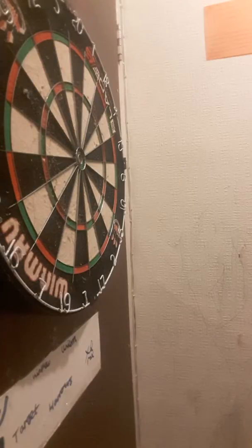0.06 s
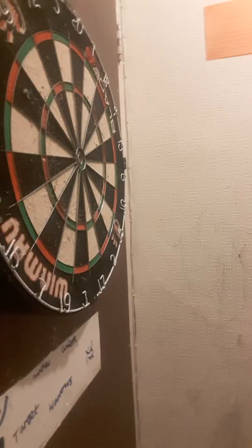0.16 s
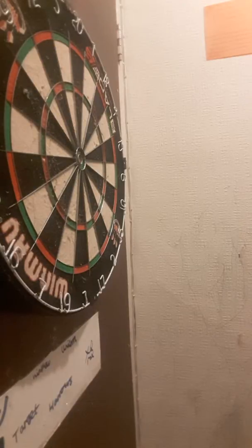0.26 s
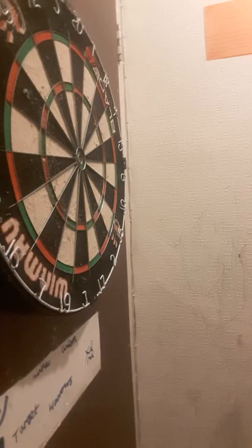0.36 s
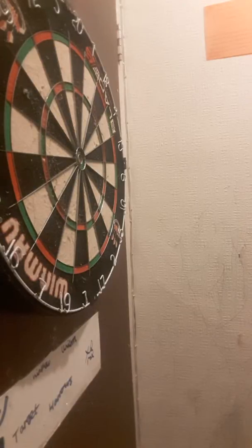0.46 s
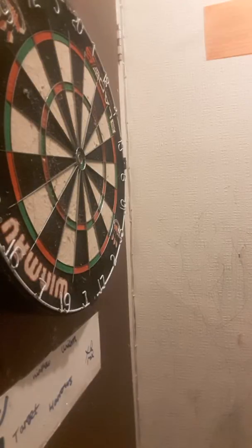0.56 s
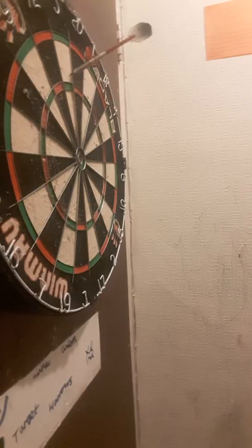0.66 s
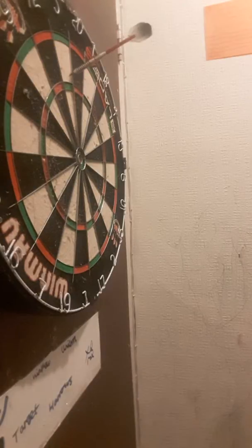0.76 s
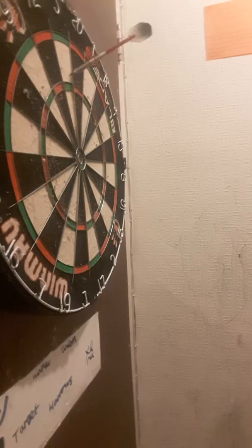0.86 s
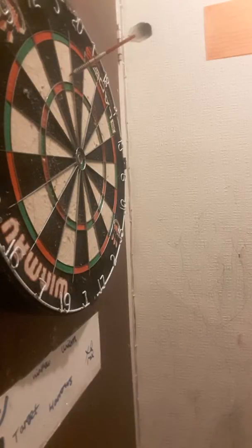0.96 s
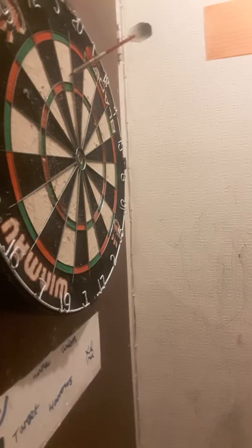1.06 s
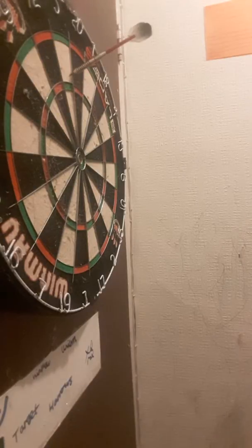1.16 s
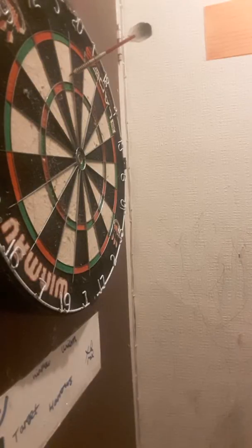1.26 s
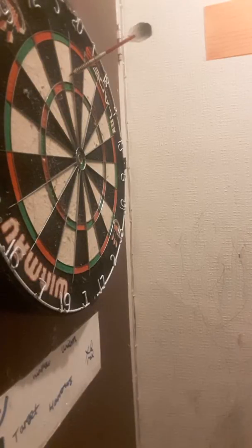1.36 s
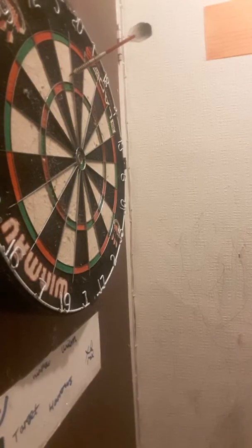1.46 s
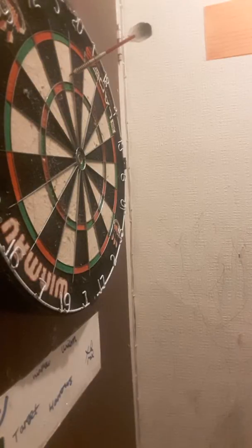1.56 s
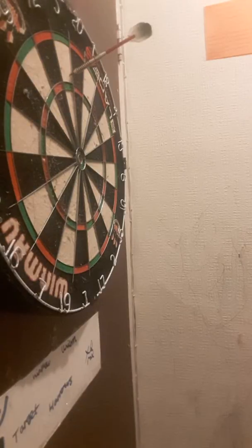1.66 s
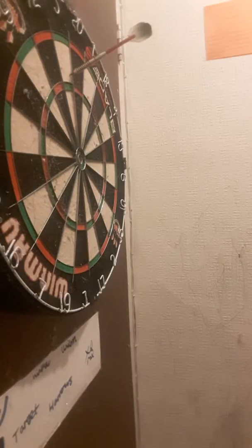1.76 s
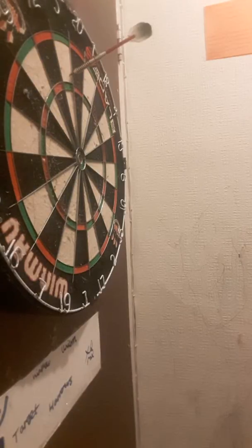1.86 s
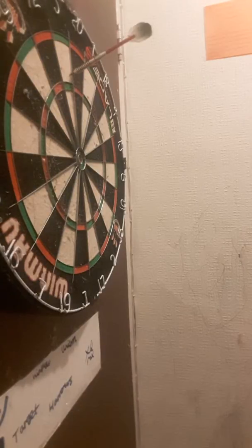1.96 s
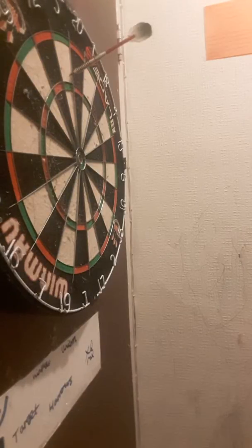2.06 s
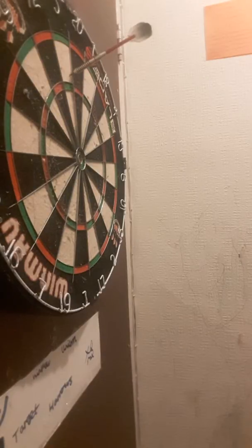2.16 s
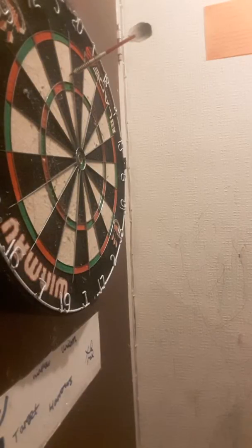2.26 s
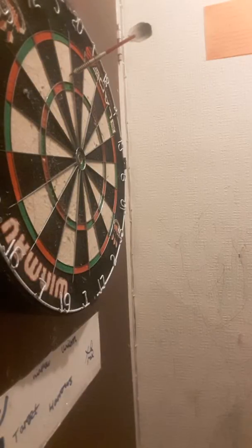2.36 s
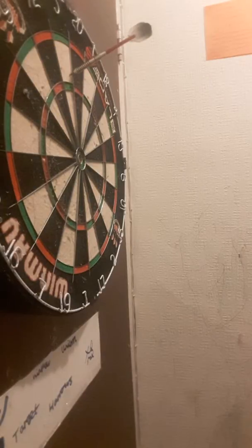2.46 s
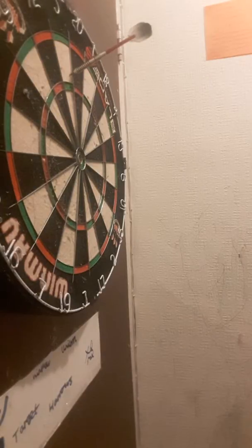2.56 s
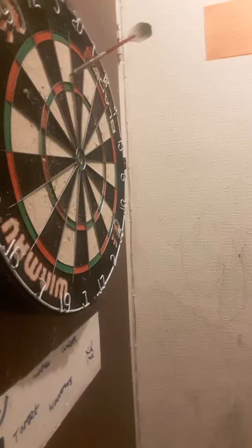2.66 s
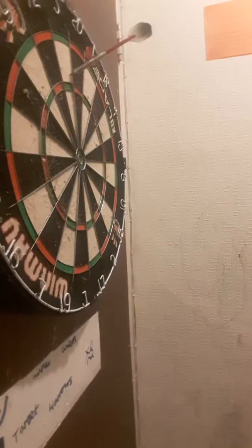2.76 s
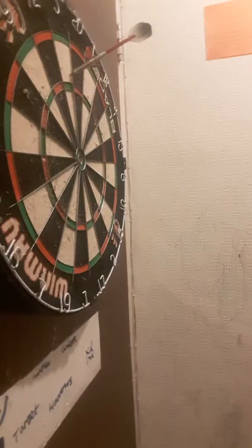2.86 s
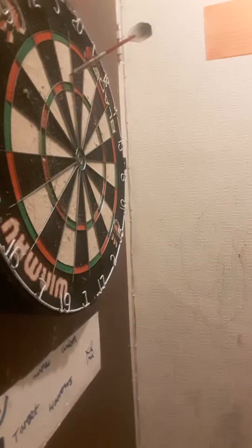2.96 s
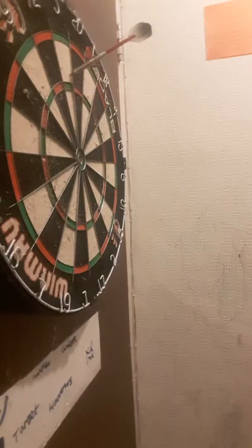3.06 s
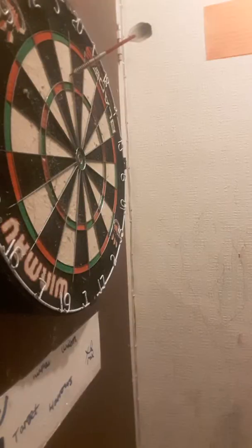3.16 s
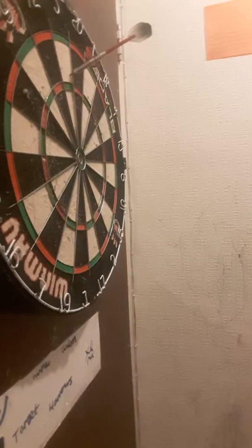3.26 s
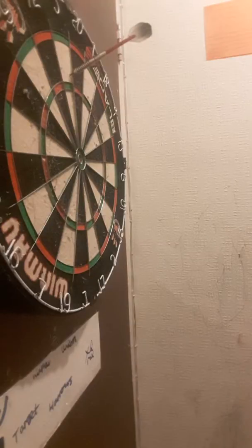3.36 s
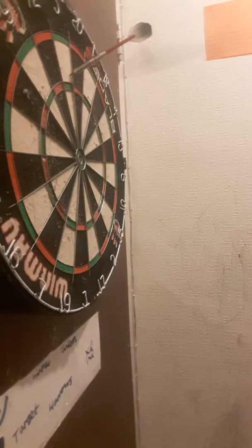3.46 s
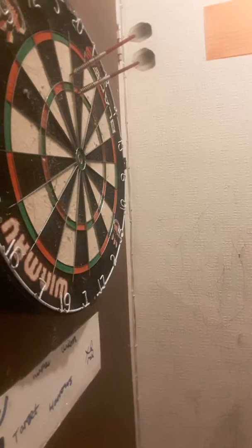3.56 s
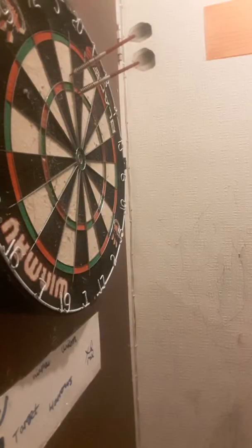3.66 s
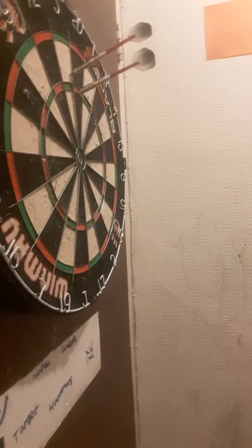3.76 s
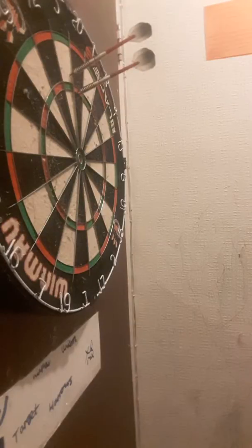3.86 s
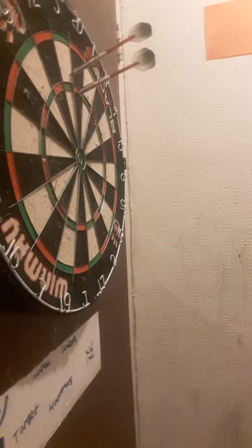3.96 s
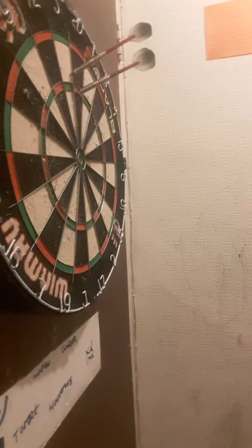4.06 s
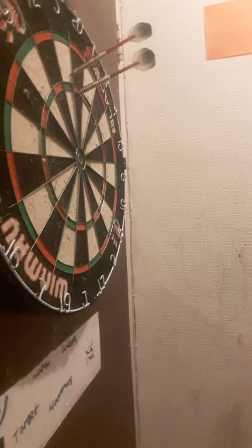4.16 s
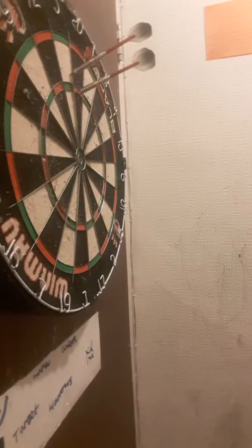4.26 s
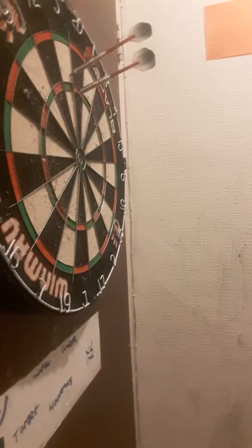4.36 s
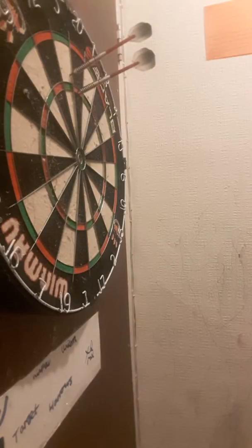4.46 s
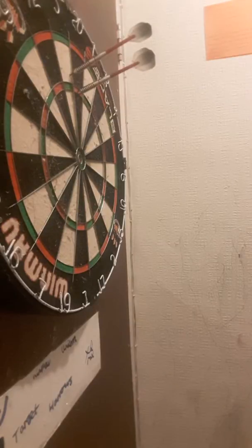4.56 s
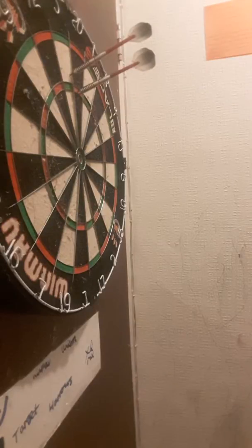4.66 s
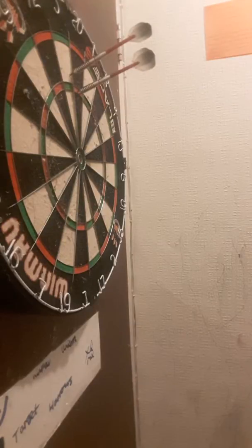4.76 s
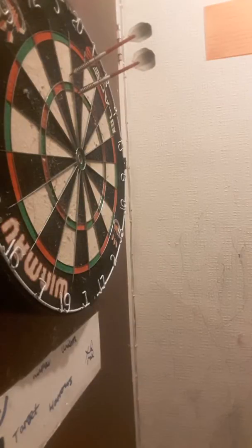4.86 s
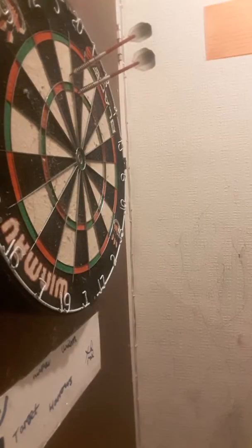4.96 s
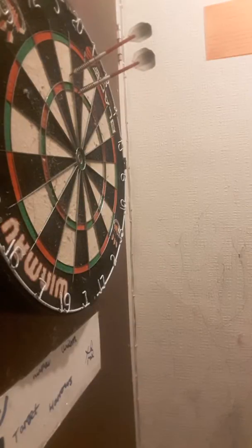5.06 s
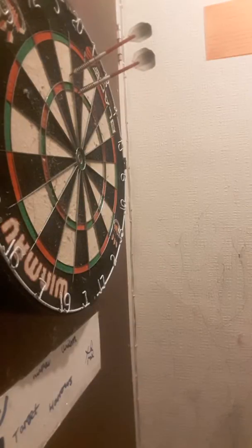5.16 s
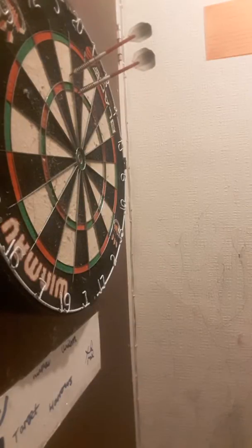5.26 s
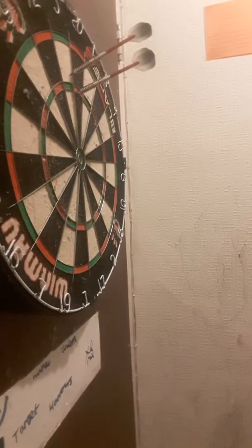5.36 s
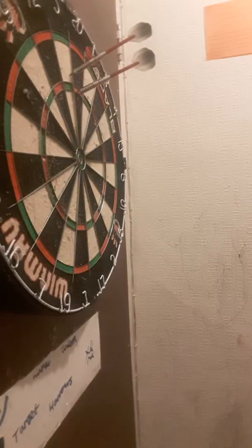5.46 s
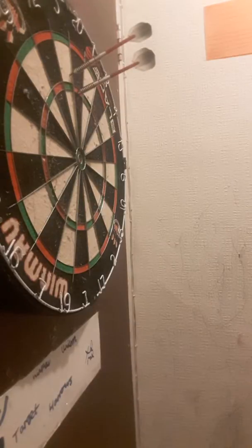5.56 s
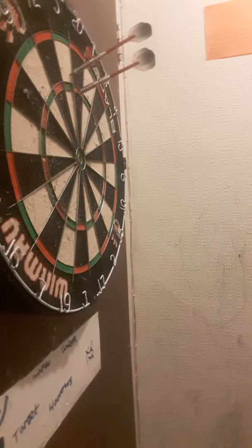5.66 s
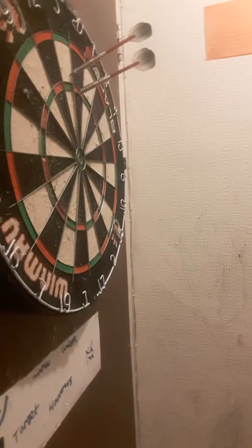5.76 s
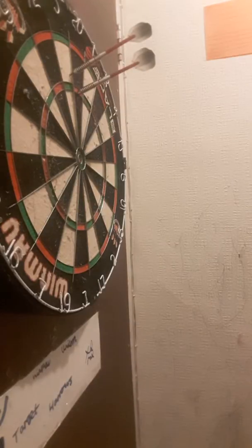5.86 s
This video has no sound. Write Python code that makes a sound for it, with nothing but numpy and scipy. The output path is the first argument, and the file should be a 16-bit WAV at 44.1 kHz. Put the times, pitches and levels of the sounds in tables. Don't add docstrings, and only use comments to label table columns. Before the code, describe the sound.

A phone microphone near a dartboard picks up two separate throws nearly three seconds apart. Each is a sudden woody thump with a fibrous crunch, short hollow boom and tiny quiver ticks; the second is stronger and brighter. Between them the room is almost silent apart from a small clink and shifting weight on floorboards. Low, muffled footsteps end it over faint rumble and hiss.

```python
import sys
import numpy as np
from scipy import signal
from scipy.fft import rfft, irfft, next_fast_len
from scipy.io import wavfile
from scipy.ndimage import map_coordinates

SR = 44100
rng = np.random.default_rng(int(sys.argv[2]) if len(sys.argv) > 2 else 0)


def materialize(psi):
    bounded = np.clip(np.atleast_2d(psi).T, -1, 1)
    quanta = np.round(bounded * 32767).astype(np.int16)
    wavfile.write(sys.argv[1], SR, quanta)


def boost(x):
    u = np.asarray(x, float) / 20
    return 10 ** u


N = 261072

# touch_s, weight_lag_s (weight lands after the point), boom_db, build_up_s, crackle_db
DARTS = [
    (0.6791, 0.00301, -19.5, 0.0047, -45.5),
    (3.5504, 0.001885, -15.5, 0.01, -33.5),
]
# pitch_hz, level_db (per Hz)
SCUFF = [(250, -6.5), (500, -0.5), (720, 3), (1300, -6.5), (2600, -19.5), (4500, -50.5), (7000, -93)]


def unit(x):
    return x / np.sqrt(np.mean(x ** 2) + 1e-20)


def along(points, hz):
    f, v = np.transpose(points)
    return np.interp(np.log(hz + 1), np.log(f + 1), v)


def peaks(modes):
    def response(f):
        total = 0
        for k, (centre, width, db) in enumerate(modes):
            damping = 1j * f * width
            total = total + (-1) ** k * boost(db) * damping / (centre * centre - f * f + damping)
        return total
    return response


def tinted(spectrum):
    return lambda hz: boost(along(spectrum, hz))


def noise(size, response):
    m = next_fast_len(size + 8192)
    spectrum = rfft(rng.standard_normal(m)) * response(np.fft.rfftfreq(m, 1 / SR))
    return unit(irfft(spectrum, m)[:size])


def grit(size, rate, depth_db):
    lumps = rng.standard_normal(int(size * rate / SR) + 4)
    smooth = map_coordinates(lumps, [np.arange(size) * rate / SR])
    return unit(boost(depth_db * smooth))


def pulse(t, db, hz, cycles):
    return boost(db) * np.sin(-2 * np.pi * hz * t) * np.exp(-(hz * t / cycles) ** 2)


def add(track, s, x):
    part = track[round(s * SR):][:len(x)]
    part += x[:len(part)]


def fading(response):
    # pitch_hz, t60_s
    early = [(40, 0.64), (150, 0.4), (400, 0.18), (1200, 0.092), (2500, 0.18), (5000, 0.15), (11000, 0.13)]
    # pitch_hz, t60_s
    late = [(40, 0.98), (150, 0.9), (400, 0.35), (1200, 0.58), (2500, 0.54), (5000, 1), (11000, 0.3)]
    # pitch_hz, level_db
    late_db = [(40, -14.5), (400, -14.5), (1200, -13.5), (2500, -29), (5000, -28), (11000, -26.5)]
    hz, t, z = signal.stft(noise(SR, response), SR, nperseg=256)
    first = boost(-60 * t / along(early, hz)[:, None])
    tail = boost(along(late_db, hz)[:, None] - 60 * t / along(late, hz)[:, None])
    return signal.istft(z * (first + tail), SR, nperseg=256)[1][:SR]


def thuds():
    # pitch_hz, level_db, t60_s
    panel_1 = [(47.2, -12, 0.52), (140.9, -2.5, 0.32), (177.8, 3.5, 0.23), (252, -15.5, 0.42),
               (325, -7, 0.43), (386, -15, 0.46), (470, -21, 0.051), (528, -28, 0.2), (654, -12, 0.23),
               (750, -45, 0.096), (1024, -30, 0.035), (1179, -14.5, 0.15), (1497, -1, 0.026),
               (1975, -13.5, 0.034)]
    panel_2 = [(54.7, -15.5, 0.42), (119, -6.5, 0.3), (143.8, -19.5, 0.8), (199.5, -7.5, 0.44),
               (264.4, -6.5, 0.22), (331, -8.5, 0.44), (397, -22.5, 0.5), (494, -18, 0.32),
               (592, -16.5, 0.26), (767, -20, 0.14), (894, -33, 0.51), (1043, -17.5, 0.19),
               (1260, -37.5, 0.44), (1927, -10, 0.054)]
    # pitch_hz, level_db (per Hz)
    thud_1 = [(18, -48), (45, -11), (85, -15), (180, -11), (421, -6), (527, -3.5), (608, -14.5),
              (844, -14.5), (1100, -20.5), (1950, -36.5), (4000, -74), (5200, -90.5), (8800, -120)]
    thud_2 = [(18, -48), (45, -13.5), (85, -19), (171, -17), (322, -6.5), (421, -11), (516, -9), (778, -22),
              (861, -17.5), (1150, -32.5), (1950, -34.5), (4000, -53), (8800, -120)]
    # pitch_hz, width_hz, level_db
    crackle_1 = [(3210, 1500, -24.5), (4760, 290, -8.5), (6000, 190, -13), (7660, 1200, -15.5),
                 (9480, 350, 2), (11800, 970, -4), (14700, 2100, -18)]
    crackle_2 = [(3200, 1600, -18), (4900, 640, -6), (7130, 1250, -11.5), (9020, 540, -3.5),
                 (10920, 910, 1), (12300, 2200, -7), (14800, 1900, -17)]
    # pitch_hz, level_db (per Hz)
    bite = [(400, -29.5), (800, 0.5), (1200, -5.5), (1600, -8.5), (2150, -1), (2400, -17), (3100, -24.5),
            (4000, -53), (7000, -73.5)]
    # pitch_hz, level_db (per Hz)
    far = [(500, -23.5), (1000, 2.5), (2500, -6.5), (5500, -17), (7000, -21.5), (11000, -17), (15700, -21),
           (16000, -81)]
    lead_db, bite_db, far_db = -10, -10, -43
    out, t = np.zeros(N), np.arange(SR) / SR
    soft = 1 - np.exp(-(t / 0.00087) ** 2)
    surfaces = zip(DARTS, (panel_1, panel_2), (thud_1, thud_2), (crackle_1, crackle_2))
    for (s, lag, db, build, crackle_db), modes, thud, crackle in surfaces:
        add(out, s, boost(crackle_db) * soft * grit(SR, 330, depth_db=2.0) * fading(peaks(crackle)))
        add(out, s, boost(db + lead_db - 60 * t / 0.0094) * soft * noise(SR, tinted(thud)))
        stop = grit(SR, 210, depth_db=1.6) * noise(SR, tinted(bite))
        add(out, s + lag, boost(db + bite_db - 60 * t / 0.14) * soft * stop)
        add(out, s, boost(db + far_db - 60 * t / 1.6) * soft * noise(SR, tinted(far)))
        ring = np.zeros(SR)
        for hz, mode_db, t60 in modes:
            waver = grit(SR, 22, depth_db=0.5)
            ring += boost(mode_db - 60 * t / t60) * np.sin(2 * np.pi * hz * t) * waver
        add(out, s + lag, boost(db + 5) * soft * ring * (1 - 0.97 * np.exp(-t / build)))
        roar = fading(tinted(thud)) * (1 - 0.76 * np.exp(-t / build))
        add(out, s + lag, boost(db + 3.0) * soft * roar)
    return out


def swings():
    # after_touch_s, over_boom_db, pitch_hz, length_cycles
    knocks = [
        (.005, 4, 852, 0.62),
        (.046, -9, 859, 8.3),
        (0.136, -16.5, 203, 5),
    ]
    # centre_s, level_db, pitch_hz, length_cycles
    wall = [
        (.7265, -10, 182, .5),
        (3.574, -9, 311, 2.33),
        (3.655, -30.5, 71.5, 1.9),
    ]
    t, out = np.arange(N) / SR, np.zeros(N)
    for s, _, db, *_ in DARTS:
        for after, over_db, hz, cycles in knocks:
            out += pulse(t - s - after, db + over_db, hz, cycles)
    for s, db, hz, cycles in wall:
        out += pulse(t - s, db, hz, cycles)
    return out


def ticks():
    # after_touch_s, flight_over_boom_db, t60_s, shaft_over_boom_db
    quiver = [
        (0.0085, -23.5, 0.015, -32.5),
        (.0225, -28.5, 0.0069, -38.5),
        (0.1357, -49, .011, -36),
    ]
    # start_s, flight_db, t60_s, shaft_db
    more = [
        (0.707, -52, .01, -60),
        (0.808, -59.5, .024, -43.5),
        (3.552, -38, .032, -45.5),
        (3.624, -50, .016, -43),
        (3.6815, -55.5, .018, -43),
    ]
    # pitch_hz, level_db (per Hz)
    flight = [(2500, -41), (5000, -15), (7000, -2), (9500, -6), (12000, 6.5), (15300, -4.5), (16200, -48)]
    # pitch_hz, level_db (per Hz)
    shaft = [(300, -30), (700, 10), (1300, 5), (2100, 3), (2800, -15), (4500, -36), (8000, -60)]
    out, t = np.zeros(N), np.arange(SR // 8) / SR
    shared = [(s + after, db + flight_db, t60, db + shaft_db)
              for s, _, db, *_ in DARTS for after, flight_db, t60, shaft_db in quiver]
    for s, flight_db, t60, shaft_db in shared + more:
        snap = boost(flight_db) * noise(len(t), tinted(flight))
        snap += boost(shaft_db) * noise(len(t), tinted(shaft))
        add(out, s, snap * boost(-60 * t / t60) * (1 - np.exp(-t / 0.00052)))
    return out


def clinks():
    # start_s, level_db, rise_s, t60_s
    bursts = [
        (1.229, -64, .001, 0.14),
        (1.709, -47.5, 0.0028, 0.13),
        (4.72, -63, 0.0037, 0.4),
    ]
    # pitch_hz, width_hz, level_db
    barrels = [
        [(1970, 250, -10), (4800, 250, -17), (5700, 310, -14), (8400, 500, -12), (11300, 1800, -26)],
        [(1740, 290, 1.5), (2090, 126, 11.5), (4730, 230, -3.5), (9150, 400, -9.5), (11300, 500, -7),
         (14500, 1400, -20)],
        [(1670, 370, -1.5), (2610, 80, 1.5), (4800, 700, -27.5), (11500, 880, -16.5)],
    ]
    # start_s, level_db, t60_s
    contacts = [
        (1.229, -72, .015),
        (1.694, -70, .15),
        (1.710, -59, .012),
        (1.7163, -51, 0.027),
        (4.722, -81, .12),
    ]
    # pitch_hz, level_db (per Hz)
    snap = [(500, -5), (1500, 2), (4000, -6), (8000, -14), (15500, -7), (16000, -60)]
    out, t = np.zeros(N), np.arange(SR // 3) / SR
    for (s, db, rise, t60), barrel in zip(bursts, barrels):
        add(out, s, boost(db - 60 * t / t60) * noise(len(t), peaks(barrel)) * (1 - np.exp(-t / rise)))
    for s, db, t60 in contacts:
        add(out, s, boost(db - 60 * t / t60) * noise(len(t), tinted(snap)) * (1 - np.exp(-t / .0003)))
    return out


def floorboards():
    # start_s, hold_s, level_db, soles_db (relative to the board)
    weight = [(.005, 0.041, -58, -32), (0.375, 0.024, -66, -18), (0.477, 0.21, -60, -10.5),
              (1.025, 0.016, -66, -21), (1.313, 0.081, -61.5, -29), (1.713, 0.019, -59, -11),
              (2.049, 0.096, -57.5, -19), (2.874, 0.087, -57, -26), (3.401, 0.18, -57, -13),
              (3.877, 0.024, -54, -16.5), (4.324, 0.028, -64, -18), (4.477, .04, -74.5, 2),
              (4.852, 0.093, -48, -16.5), (5.04, 0.11, -52.5, -15.5), (5.337, 0.093, -57.5, -9),
              (5.67, 0.021, -57.5, -21)]
    # pitch_hz, width_hz, level_db
    boards = [(54.8, 27, -13), (139, 11.67, 4.5), (245, 50, -4), (344, 70, -11.5)]
    roll_s, release_s = 0.028, 0.23
    rest_db, restless_db, scuff_rest_db = -70.5, 6, -78.5
    t = np.arange(N) / SR
    load, soles = np.zeros(N), np.zeros(N)
    for s, hold, db, soles_db in weight:
        rise = np.clip((t - s) / roll_s + .5, 0, 1) ** 2
        roll = boost(db - 60 * np.maximum(t - s - hold, 0) / release_s) * rise
        load += roll
        soles += boost(soles_db) * roll

    def creak(f):
        return peaks(boards)(f) * boost(along([(350, -0.5), (900, 12.5)], f))

    stir = load * grit(N, 30, depth_db=0.0) + boost(rest_db) * grit(N, 8, restless_db)
    rub = soles * grit(N, 60, depth_db=2.4) + boost(scuff_rest_db) * grit(N, 12, restless_db)
    return stir * noise(N, creak) + rub * noise(N, tinted(SCUFF))


def steps():
    # start_s, peak_db, pitch_hz, t60_s, scuff_db (relative to the bump)
    contacts = [(4.307, -32.5, 219, 0.04, -36), (4.313, -43.5, 137, 0.12, -38.5),
                (4.650, -41, 179, 0.047, -22.5), (4.775, -46.5, 246, 0.24, -4.5),
                (4.813, -30, 139, 0.17, -27), (4.98, -44.5, 262, 0.082, -13), (5.055, -38, 135, 0.038, -20),
                (5.142, -43.5, 163, 0.076, -33), (5.654, -35, 245, 0.061, -26.5),
                (5.654, -43, 62, 0.099, -42), (5.351, -53.5, 237, .08, -13)]
    out, t = np.zeros(N), np.arange(SR // 3) / SR
    for s, db, hz, t60, scuff_db in contacts:
        bump = (1 - np.exp(-t / 0.0016)) * np.sin(2 * np.pi * hz * t)
        add(out, s, boost(db - 60 * t / t60) * bump)
        brush = (1 - np.exp(-t / 0.0018)) * noise(len(t), tinted(SCUFF))
        add(out, s, boost(db + scuff_db - 60 * t / 0.18) * brush)
    return out


def background():
    # pitch_hz, level_db (per Hz)
    rumble = [(15, -48), (36, -6), (80, -9.5), (100, -4.5), (236, -7.5), (270, -7), (300, -11.5),
              (408, -10.5), (796, -16), (1500, -23.5), (1950, -42), (3300, -120)]
    # pitch_hz, level_db (per Hz)
    hiss = [(600, -25), (1500, -1), (2500, -4.5), (4000, -11), (6000, -12.5), (6500, -18), (9000, -19),
            (11000, -18), (13000, -16.5), (15600, -18.5), (15850, -67)]
    # pitch_hz, width_hz, level_db
    hum = [
        (100.1, 9.3, -70.5),
        (1188, 22, -82.5),
        (3600, 110, -94),
    ]
    # pitch_hz, level_db
    whine = [(13090, -102)]
    out = boost(-64 - 1.0) * noise(N, tinted(rumble)) + boost(-76 + 0.48) * noise(N, tinted(hiss))
    for hz, width, db in hum:
        tone = peaks([(hz, width, 0)])
        out += boost(db) * noise(N, lambda f: tone(f) ** 2)
    for hz, db in whine:
        out += boost(db - 1.0) * np.sin(2 * np.pi * hz * np.arange(N) / SR)
    return out


def scene():
    mix = thuds() + swings() + ticks() + clinks() + floorboards() + steps() + background()
    return mix[None]


def low_pass(x):
    return signal.sosfilt(signal.butter(12, 15850, fs=SR, output="sos"), x)


def record(dry):
    low_cut = signal.butter(2, 33, "high", fs=SR, output="sos")
    high_cut = signal.butter(12, 16000, "low", fs=SR, output="sos")
    mix = signal.sosfilt(np.vstack([low_cut, high_cut]), dry) - .0005
    return low_pass(mix)


dry = scene()
out = record(dry)
materialize(out)
```